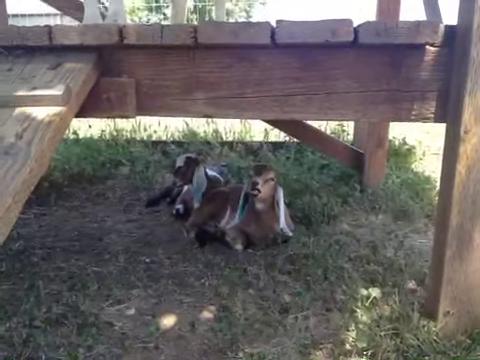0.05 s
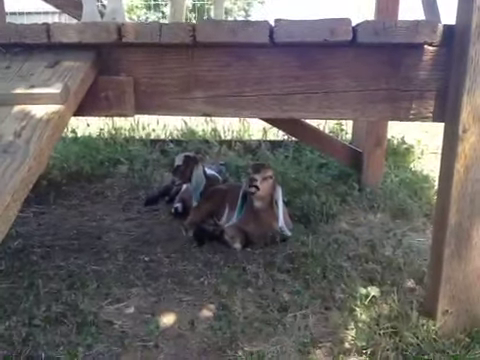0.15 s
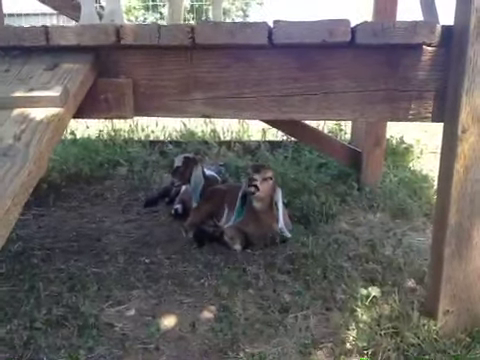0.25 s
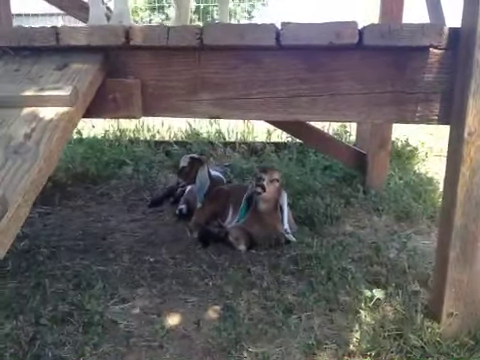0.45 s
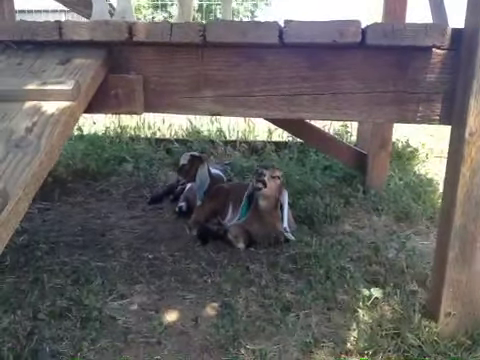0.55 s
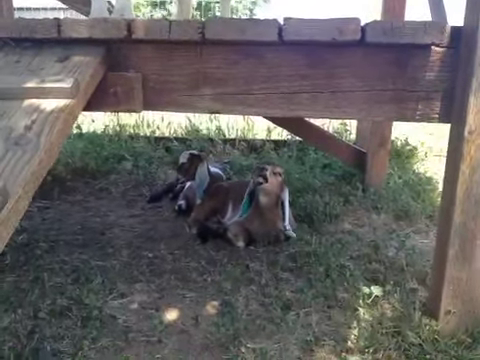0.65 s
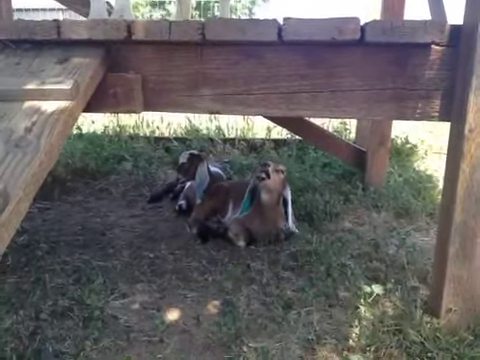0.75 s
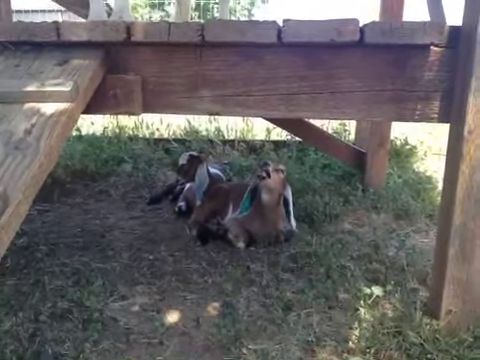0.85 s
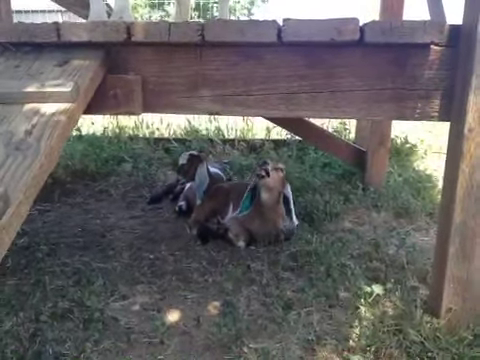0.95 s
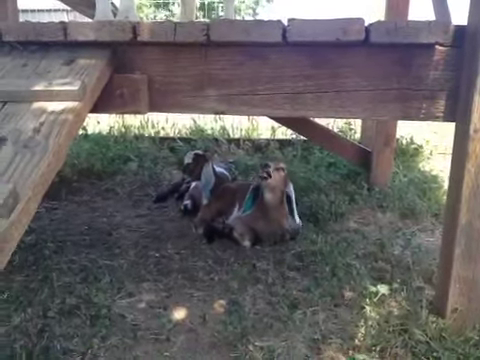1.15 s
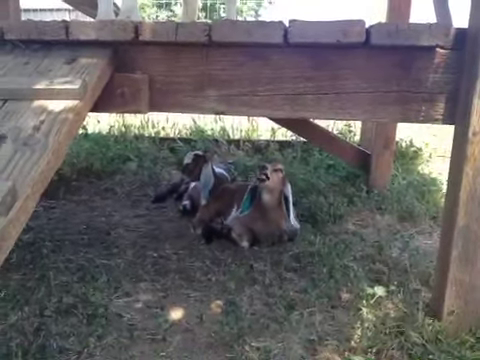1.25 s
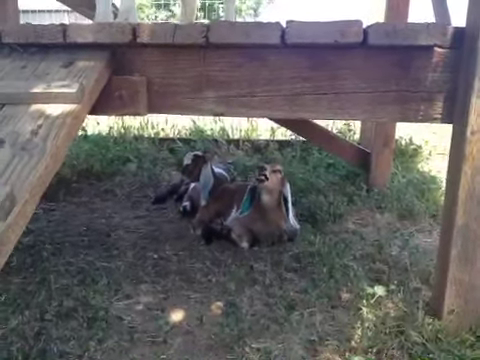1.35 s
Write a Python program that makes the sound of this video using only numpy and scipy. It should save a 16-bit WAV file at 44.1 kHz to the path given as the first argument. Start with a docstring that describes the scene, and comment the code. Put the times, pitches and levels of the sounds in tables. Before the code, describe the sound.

Close by in a quiet yard, a goat kid bleats once, loudly. The call wavers upward, holds and falls off with a rasp, echoing briefly under a wooden deck before a few barely audible rustles.

```python
"""Goat kid under a deck

A goat kid lying under a wooden deck hums with its mouth shut, then opens it into one loud bleat:
vocal fold pulses and raspy breath, shaped by the throat. The call wavers up twice, holds its top
note while the head lifts, and drops away rough. The boards answer briefly; faint rustles and a
soft low hum follow in the quiet yard."""
import sys
import numpy as np
from scipy import signal
from scipy.fft import rfft, irfft, next_fast_len
from scipy.io import wavfile
from scipy.ndimage import uniform_filter1d, map_coordinates

SR = 44100
rng = np.random.default_rng(int(sys.argv[2]) if len(sys.argv) > 2 else 0)


def persist_wave(psi):
    """Save psi, clipped to +-1, as 16-bit WAV."""
    counts = np.round(np.clip(psi, -1, 1) * 32767).astype(np.int16)
    wavfile.write(sys.argv[1], SR, np.atleast_2d(counts).T)


N = 61739


def bleat(harmonics=44, rasp_db=5.5, pulsing_share=.7):
    """Vocal fold pulses and pulsed air noise pass through the moving throat."""
    # Melody of the call (time [s], pitch [Hz])
    melody = [(0, 384.7), (.02, 362.2), (.06, 362), (.138, 387.8), (.158, 346), (.18, 371.6), (.2, 406.3),
              (.222, 426.3), (.28, 401.2), (.296, 413.6), (.326, 456.8), (.354, 464.8), (.385, 444.3),
              (.418, 428), (.465, 454.8), (.51, 476), (.57, 480.9), (.63, 477.3), (.725, 481.8),
              (.77, 473.7), (.855, 468.1), (.905, 443.6), (.928, 416.3), (.948, 343.5), (.972, 246.4)]
    # Delivery of the call (time [s], effort [dB], mouth opening [0-1], roughness [dB])
    delivery = [(0, -23.5, 0.07, -19.5), (.135, -21.5, 0.06, -34.5), (.158, -15.5, 0.2, -16),
                (.187, -3.5, 0.22, -16), (.215, -3, 0.81, -25), (.25, 0.5, 0.5, -30), (.29, -4, 0.77, -38),
                (.32, -1.5, 0.84, -18), (.352, -1, 0.97, -57), (.38, -4.5, 0.87, -25), (.41, 1, 0.68, -40),
                (.445, -0.5, 0.79, -24), (.495, -3.5, 0.98, -36.5), (.6, -1, 0.95, -30.5),
                (.72, 0.5, 0.93, -35.5), (.745, 0, 0.94, -35), (.78, -2.5, 0.95, -30.5),
                (.85, -1.5, 0.91, -32), (.88, -1, 0.79, -30.5), (.912, 2, 0.72, -28.5),
                (.941, -2.5, .35, -25.5), (.958, -9.5, 0.12, -14.5), (.972, -32, 0, -16),
                (1.0, -59, 0.28, -12)]
    # Tone of the breath ahead of the throat (frequency [Hz], gain [dB])
    rasp_colour = [(60, -37.5), (300, -9), (900, -13), (1400, -19), (2200, -9), (3700, 4), (5500, 1.5),
                   (8500, 10), (15000, 4.5)]
    pitch, = curves(melody)
    effort_db, mouth, rough_db = curves(delivery)
    rough = amp(rough_db)
    postures = throat_postures(mouth)
    quiver = .06 * rough * wobble(per_s=140)  # pitch tremor
    jitter = .035 * rough * wobble(per_s=450)  # scatter of pulse timing
    phase = 2 * np.pi * (np.cumsum(pitch * (1 + quiver)) / SR + jitter)
    k = np.arange(1, harmonics + 1)[:, None]
    response = sum(share * throat_response(shape, k * pitch) for shape, share in postures)
    gain = np.exp(uniform_filter1d(response.real, size=200, axis=1)) * (k * pitch < SR / 2)
    # Nearby surfaces shift each overtone's phase a little, softening the pulses
    smear = .35 * rng.standard_normal((harmonics, 1))
    lag = uniform_filter1d(response.imag, size=1200, axis=1) + smear
    shimmer = .2 * rough * wobble(per_s=420)  # scatter of pulse size
    voice = np.sqrt(2) * (gain * np.cos(k * phase + lag)).sum(0) * (1 + shimmer)
    breath = sum(np.sqrt(share) * noise(lambda hz: along(shape, hz) + along(rasp_colour, hz))
                 for shape, share in postures)
    pulsing = 1 + pulsing_share * np.cos(phase)  # air let through once a cycle
    rasp = amp(rasp_db) * rough * np.sqrt(SR / 2 / pitch) * breath * pulsing
    return amp(effort_db) * (voice + rasp)


def throat_postures(mouth):
    """The vowel morphs as the mouth opens and the head lifts: pairs of spectrum and share over time."""
    # Throat resonances in each posture (frequency [Hz], gain [dB])
    mouth_shut = [(360, -38), (730, -38.5), (1100, -51), (1480, -39.5), (1820, -46.5), (2200, -41.5),
                  (2800, -76), (3700, -49), (4800, -66), (5500, -45), (6500, -62.5), (8500, -62.5),
                  (10000, -88), (15000, -84.5)]
    mouth_ajar = [(280, -69), (700, -33.5), (1000, -48), (1300, -25.5), (1520, -26), (1850, -36.5),
                  (2100, -41.5), (2520, -30), (3000, -42), (3600, -43), (4400, -48), (5400, -43.5),
                  (7000, -55.5), (8500, -59.5), (10000, -67), (12000, -77.5), (14500, -76.5)]
    half_open = [(250, -61.5), (420, -50.5), (830, -39.5), (1290, -30), (1480, -44.5), (1720, -41.5),
                 (2150, -46.5), (2530, -30.5), (2900, -41.5), (3300, -48.5), (3800, -42), (4400, -48.5),
                 (4900, -50.5), (5300, -37.5), (5600, -42), (6300, -51), (7200, -62), (8500, -57),
                 (9800, -80), (12000, -88.5), (14400, -61.5), (15500, -90)]
    wide_open = [(470, -43), (950, -37), (1200, -40), (1390, -10.5), (1460, -7), (1850, -27), (2400, -29.5),
                 (2870, -30), (3830, -27.5), (4300, -43.5), (4800, -33), (5300, -32), (6200, -41.5),
                 (6700, -44), (7200, -41), (8500, -39.5), (10500, -48.5), (13000, -62.5), (14200, -58),
                 (15500, -72.5)]
    head_up = [(470, -50.5), (950, -50), (1200, -25), (1390, -5.5), (1460, -9), (1850, -30), (2350, -28),
               (2830, -20.5), (3300, -29.5), (4250, -25.5), (4700, -28), (5200, -26.5), (5700, -47),
               (6150, -32.5), (6700, -46), (8300, -35.5), (10000, -46.5), (11800, -61), (15200, -69.5)]
    shut, ajar, half, wide = [np.interp(mouth, np.linspace(0, 1, 4), row) for row in np.eye(4)]
    lifted = ramp(middle_s=.7775, length_s=.0503)
    return [(mouth_shut, shut), (mouth_ajar, ajar), (half_open, half),
            (wide_open, wide * (1 - lifted)), (head_up, wide * lifted)]


def throat_response(shape, hz, size=4096):
    """One posture as a causal filter: log gain in the real part, phase in the imaginary part."""
    grid = np.fft.rfftfreq(size, 1 / SR)
    cepstrum = irfft(np.log(amp(along(shape, grid))))
    cepstrum[1:size // 2] *= 2
    cepstrum[size // 2 + 1:] = 0
    return np.interp(hz, grid, rfft(cepstrum))


def voice_catch():
    """The voice catches in a brief, narrow rasp as the head starts to lift."""
    return amp(-40) * swell(middle_s=.742, width_s=.007) * band_noise(centre_hz=3550, q=7)


def echoes(call, tail_db=-11.5):
    """Tight reflections under the deck and a short tail from the yard."""
    # Early echoes from ground, deck, beam and posts (delay [s], level [dB])
    reflections = [(.0031, -38.5), (.0058, -22.5), (.0097, -22), (0.0122, -25.5), (0.0213, -43)]
    # Decay of the yard (frequency [Hz], time to fall 60 dB [s])
    yard_t60 = [(300, .16), (1500, 0.13), (5000, .17), (14000, 0.057)]
    early = filtered(call, lambda hz: sum(amp(db) * np.exp(-2j * np.pi * hz * s)
                                          for s, db in reflections))
    hz, t, spectrum = signal.stft(rng.standard_normal(SR // 2), SR, nperseg=256)
    decay = amp(-60 * t / along(yard_t60, hz)[:, None])
    tail = signal.istft(spectrum * decay, SR, nperseg=256)[1]
    return early + amp(tail_db) * signal.fftconvolve(call, tail / np.linalg.norm(tail))[:N]


def rustles():
    """Short soft swells of noise, some dull and some crisp."""
    # Rustle cues (time [s], width [s], level [dB], treble lift [dB per octave])
    cues = [(.994, 0.0025, -48, 6), (1.01, .03, -59.5, 5), (1.149, 0.048, -72, -4.5),
            (1.238, .007, -63, 5.5), (1.271, 0.026, -66.5, -3), (1.319, 0.014, -57, 1.5),
            (1.351, .02, -62.5, 3)]
    # Base tone of a rustle (frequency [Hz], relative level [dB])
    colour = [(50, 1), (250, 9.5), (700, -5.5), (1500, 2), (3000, -8), (7500, 2), (10000, -10.5),
              (15000, -10)]
    layer = np.zeros(N)
    for s, width, db, lift_db in cues:
        texture = noise(lambda hz: along(colour, hz) + lift_db * np.log2(1 + hz / 1000))
        layer += amp(db) * swell(s, width) * unit(texture)
    return layer


def bumps():
    """Dull little bumps without any ring."""
    # Bump cues (time [s], width [s], level [dB], centre [Hz])
    cues = [(0.214, 0.0019, -39.5, 450), (1.266, .014, -73, 110), (1.324, 0.018, -77, 80)]
    return sum(amp(db) * swell(s, width) * band_noise(hz, q=.98) for s, width, db, hz in cues)


def low_hum(onset_s=1.371, onset_hz=312, glide_hz_per_s=800, level_db=-60):
    """A soft, pure hum fades in and glides upward."""
    pitch = onset_hz + glide_hz_per_s * (clock() - onset_s)
    tone = np.sqrt(2) * np.sin(2 * np.pi * np.cumsum(pitch) / SR)
    return amp(level_db) * ramp(onset_s, length_s=.012) * tone


def yard_air(level_db=-66.5):
    """The still air of the yard: a steady bed of dark noise."""
    # Tone of the air (frequency [Hz], relative level [dB])
    colour = [(25, -39.5), (60, -19), (140, -6), (300, -10), (600, -11), (1000, -17), (1600, -15),
              (2500, -16), (4000, -18.5), (8000, -27), (15500, -26)]
    return amp(level_db) * unit(noise(lambda hz: along(colour, hz)))


def amp(db):
    """Decibels to gain."""
    return 10 ** (np.asarray(db) / 20)


def unit(x):
    """Scale to rms 1."""
    return x / np.sqrt(np.mean(x ** 2) + 1e-20)


def along(points, hz):
    """Interpolate (frequency [Hz], value) points on a log axis."""
    knots_hz, values = np.transpose(points)
    return np.interp(np.log(hz + 1), np.log(knots_hz + 1), values)


def clock():
    """Time of every sample in seconds."""
    return np.arange(N) / SR


def curves(rows):
    """A gently rounded automation curve for each column after the time."""
    times, *columns = np.transpose(rows)
    return [uniform_filter1d(np.interp(clock(), times, c), size=400, mode="nearest") for c in columns]


def ramp(middle_s, length_s):
    """A linear fade from 0 to 1."""
    return np.clip((clock() - middle_s) / length_s + .5, 0, 1)


def swell(middle_s, width_s):
    """A bell-shaped envelope."""
    return np.exp(-.5 * ((clock() - middle_s) / width_s) ** 2)


def wobble(per_s):
    """A smooth random curve with per_s knots a second."""
    return map_coordinates(rng.standard_normal(N), [clock() * per_s], mode="wrap")


def filtered(x, response):
    """Filter x by a gain function of frequency."""
    size = next_fast_len(N + SR // 2)
    return irfft(rfft(x, size) * response(np.fft.rfftfreq(size, 1 / SR)), size)[:N]


def noise(colour):
    """Noise shaped by a dB function of frequency."""
    return filtered(rng.standard_normal(N), lambda hz: amp(colour(hz)))


def band_noise(centre_hz, q):
    """Noise passed twice through one resonance, at rms 1."""
    return unit(noise(lambda hz: -20 * np.log10(1 + (q * (hz / centre_hz - centre_hz / (hz + 1))) ** 2)))


def scene():
    """The kid up front, its echoes, small stirrings and the yard behind, in mono."""
    kid = bleat() + voice_catch()
    air = yard_air()
    return (kid + echoes(kid) + rustles() + bumps() + low_hum() + air)[None]


def record(dry, top_hz=15500):
    """A brick-wall high cut on the mix."""
    return filtered(dry[0], lambda hz: hz < top_hz)[None]


dry = scene()
out = record(dry)
persist_wave(out)
```